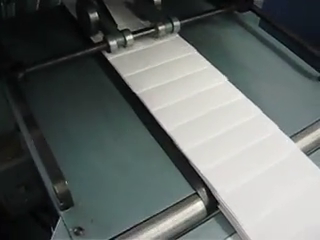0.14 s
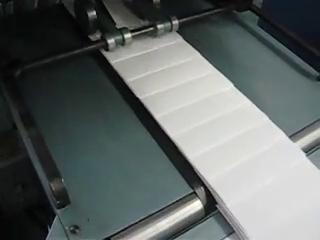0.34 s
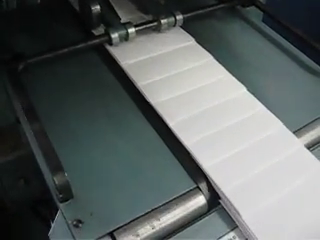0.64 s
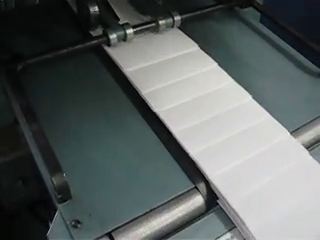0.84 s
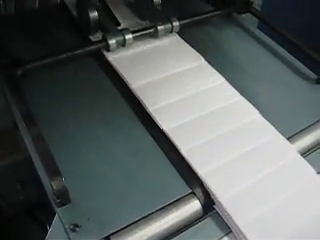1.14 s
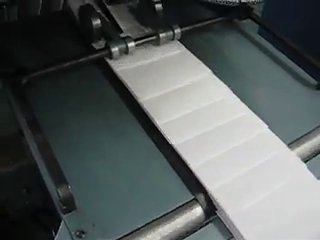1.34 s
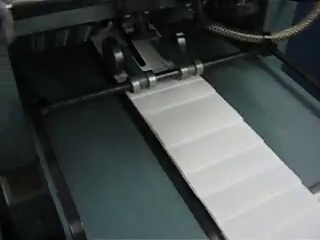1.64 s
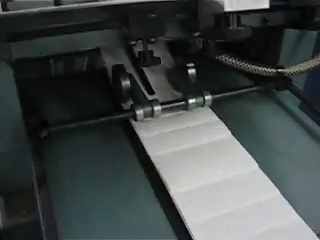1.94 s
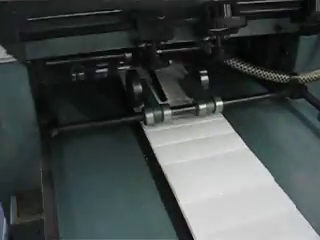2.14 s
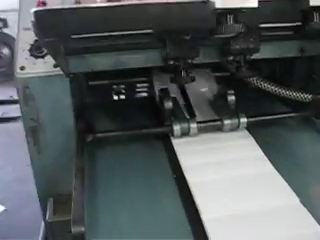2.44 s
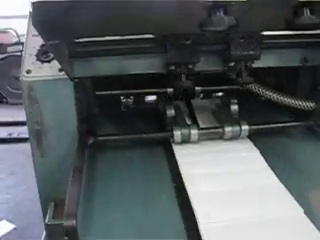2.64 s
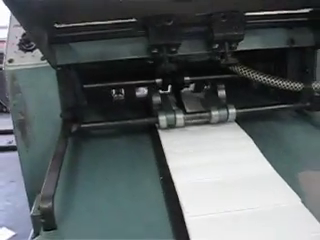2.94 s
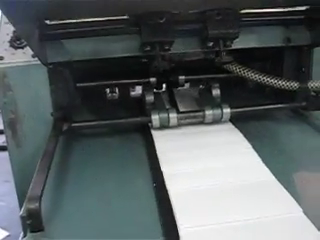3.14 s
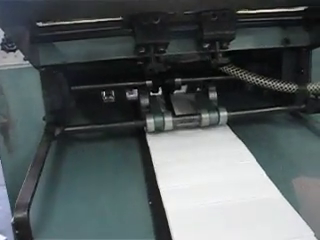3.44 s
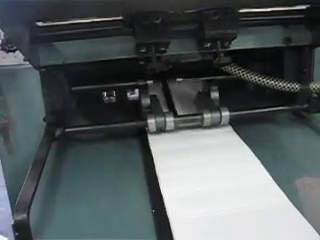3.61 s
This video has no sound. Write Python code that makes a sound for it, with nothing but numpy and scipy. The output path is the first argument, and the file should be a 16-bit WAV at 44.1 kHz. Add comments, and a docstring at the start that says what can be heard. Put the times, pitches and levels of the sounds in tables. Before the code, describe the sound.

A paper folding machine runs throughout with low motor hum, whirring rollers, rattling gears and fluttering air hiss. Sheets rustle and rumble in, swelling to sharp snaps near 0.35, 0.8, 1.2, 1.8, 2.3, 2.9 and 3.4 seconds, each followed by a short clack; light ticks precede many. From 1.4 to 2.3 seconds the microphones turn toward the rollers, changing the hiss. Close, loud, compressed, with brief workshop reverberation; another sheet rushes in at the end.

```python
"""Sheets snap into the fold of a paper folding machine in a workshop: noise bursts tick, snap and clack.
Each sheet rushes in before its snap as a growing rumble, rustle, hiss and crackle of coloured noise.
Under it the motor hums in sines, the rollers whirr and gears rattle as pulsing noise, and the feeder's air hisses.
The microphones move from beside the table round to face the rollers; the workshop answers the blows briefly.
The two microphone ports ring differently, and the limiter ducks the blows."""
import sys
import numpy as np
from scipy import signal
from scipy.fft import rfft, irfft, next_fast_len
from scipy.io import wavfile
from scipy.ndimage import uniform_filter1d, map_coordinates

SR = 44100
rng = np.random.default_rng(int(sys.argv[2]) if len(sys.argv) > 2 else 0)


def generate_wav(sig):
    """Save sig (samples, or channels by samples) to the path in sys.argv[1] as 16-bit PCM at SR."""
    pcm = np.round(np.clip(np.atleast_2d(sig).T, -1, 1) * 32767).astype(np.int16)
    wavfile.write(sys.argv[1], SR, pcm)


N = 166257
SHAFT_HZ, GEAR_HZ = 14.6, 73.47  # roller turns and gear knocks a second


def amp(db):
    """Decibels to gain."""
    return 10 ** (np.asarray(db) / 20)


def unit(x):
    """Scale to rms 1."""
    return x / np.sqrt(np.mean(x ** 2) + 1e-20)


def clock():
    """The time of every sample, in seconds."""
    return np.arange(N) / SR


def along(points, hz):
    """(frequency [Hz], value) points joined on a log frequency axis."""
    f, v = np.transpose(points)
    return np.interp(np.log(hz + 1), np.log(f + 1), v)


def curve(points):
    """(time [s], value) points joined by straight lines."""
    return np.interp(clock(), *np.transpose(points))


def wobble(rate):
    """A smooth random curve, rate knots a second."""
    return map_coordinates(rng.standard_normal(4096), [clock() * rate], mode="wrap")


def filtered(x, response):
    """x times a complex response of frequency, padded so that its ringing does not wrap round."""
    m = next_fast_len(N + SR // 2)
    hz = np.fft.rfftfreq(m, 1 / SR)
    return irfft(rfft(x, m) * response(hz), m)[..., :N]


# how alike the sound is at left and right: (frequency [Hz], likeness [0 unrelated to 1 mono])
LIKENESS = [(500, 1), (1600, .97), (2800, 0.87), (3600, 0.74), (6000, 0.53), (8500, 0.89), (11000, 0.067)]


def coloured(pair, spectrum):
    """Two unrelated signals become a stereo sound of rms 1, near mono in the bass."""
    def mid_side(hz):
        angle = np.arccos(np.clip(along(LIKENESS, hz), -1, 1)) / 2
        return amp(along(spectrum, hz)) * [np.cos(angle), np.sin(angle)]

    mid, side = filtered(pair, mid_side)
    return unit(np.array([mid + side, mid - side]))


def rush(spectrum, patchy_db):
    """Stereo noise whose gain varies in random patches of time and frequency."""
    z = signal.stft(rng.standard_normal((2, N)), nperseg=512)[2]
    field = uniform_filter1d(rng.standard_normal(z.shape[1:]), size=3, axis=0)  # across frequency
    field = uniform_filter1d(field, size=12, axis=1)  # across time
    patchy = signal.istft(z * amp(patchy_db * unit(field)), nperseg=512)[1]
    return coloured(patchy[:, :N], spectrum)


def burst(start, hold, t60):
    """A blow's envelope: sudden, held, then falling 60 dB in t60 seconds."""
    t = clock() - start
    return (t >= 0) * amp(-60 * np.clip((t - hold) / t60, 0, 2))


def beat(rate_hz, sharp, drift):
    """A swell once per turn of a slightly unsteady shaft, rms 1; drift is in turns."""
    turns = rate_hz * clock() + rng.random() + drift * wobble(5)
    return unit(np.exp(sharp * np.cos(2 * np.pi * turns)))


def strike(spectrum, start, hold, t60, crack):
    """A single crack of contact and a short rattle, both in the colour of the struck part."""
    envelope = burst(start, hold, t60)
    push = envelope * rng.standard_normal((2, N))
    push[0, int(start * SR)] += crack * np.linalg.norm(envelope)
    return coloured(push, spectrum) * np.sqrt(np.mean(push[0] ** 2))


# sheets snapping into the fold:
# (time [s], level [dB], hold [s], treble tilt above 1500 Hz [dB per octave], paper noise level [dB])
FOLDS = [(.3452, -12, .0045, 2, -2), (.8218, -9, .003, 1, 0), (1.178, -9, .004, 3.5, -.5),
         (1.8193, -7.5, .0035, 1.5, .5), (2.3418, -7, .0015, -1.5, -1), (2.942, -5, .0012, -2, -.5),
         (3.4275, -9.5, .003, -2, -.7)]
# paper edges ticking on the guides: (time [s], level [dB])
EDGE_TICKS = [(.158, -14.5), (0.285, -18), (.341, -13.5), (.762, -13), (1.118, -14), (1.761, -18),
              (2.28, -19), (2.34, -11), (2.941, -11), (3.39, -15), (3.472, -30)]
# the clack that follows each fold: (time [s], level [dB])
KNOCK_OUTS = [(.4138, -10.5), (.8893, -9.5), (1.2468, -12), (1.8877, -9), (2.408, -8.5), (3.0077, -8.5),
              (3.4947, -9.5)]
# colour of ticks and snaps: (frequency [Hz], relative level [dB per Hz])
SNAP_COLOUR = [(60, -48), (150, -30), (300, -13), (750, -2), (1700, 1.5), (2700, -4), (3500, -3), (4200, 0),
               (5700, -7), (7200, -3), (10000, -16), (15000, -28)]
# colour of the clacks: (frequency [Hz], relative level [dB per Hz])
CLACK_COLOUR = [(60, -48), (150, -26), (400, -11), (850, -9), (1300, -3), (1900, 1), (2450, -3), (3000, 3),
                (3500, -4), (4300, -2.5), (5700, -10), (7700, -8), (10000, -17), (15000, -26)]
TICK_T60_S, SNAP_T60_S = .022, .012
CLACK_HOLD_S, CLACK_T60_S = .008, .04
SNAP_CRACK, CLACK_CRACK = .35, .15  # the first contact against the rattle after it; ticks use the second


def blows():
    """Light ticks, the sharp snap of each fold and the longer clack as the sheet is knocked out."""
    out = np.zeros((2, N))
    for start, db in EDGE_TICKS:
        out += amp(db) * strike(SNAP_COLOUR, start, 0.0013, TICK_T60_S, CLACK_CRACK)
    for start, db, hold, tilt, _ in FOLDS:
        # the constant part of the tilt drops out when coloured() levels the sound
        colour = [(hz, level + tilt * np.log2(max(hz, 1500))) for hz, level in SNAP_COLOUR]
        out += amp(db) * strike(colour, start, hold, SNAP_T60_S, SNAP_CRACK)
    for start, db in KNOCK_OUTS:
        out += amp(db) * strike(CLACK_COLOUR, start, CLACK_HOLD_S, CLACK_T60_S, CLACK_CRACK)
    return out


NEXT_SHEET_S = 3.9  # when the sheet still on its way in would snap, after the end


def feed(rise_s, full_s, end_s, fall_s):
    """Each sheet swells in, is at full strength from full_s before its snap and fades end_s after it."""
    passes = [(row[0], row[-1]) for row in FOLDS] + [(NEXT_SHEET_S, 0)]
    levels = []
    for snap_s, db in passes:
        t = clock() - snap_s
        swell = np.clip((t + full_s) / rise_s + 1, 0, 1)
        fade = np.clip(1 - (t - end_s) / fall_s, 0, 1)
        levels.append(amp(db) * swell * fade)
    return np.max(levels, axis=0)


# roller and paper level at the moving microphones: (time [s], level [dB])
ROLLER_NEARNESS = [(0, -0.5), (1.35, -1.5), (1.9, 1.5), (2.5, 0.5), (3, 3), (3.77, 1.5)]
# paper rumbling through the rollers: (frequency [Hz], relative level [dB per Hz])
RUMBLE_COLOUR = [(60, -36), (250, -17), (360, -1), (600, -1), (800, -11), (1500, -2), (4000, -45)]
# paper rustling: (frequency [Hz], relative level [dB per Hz])
RUSTLE_COLOUR = [(60, -38), (300, -4), (700, -9), (1100, -1.5), (1650, 2), (2500, -1), (4000, -0.5),
                 (9000, -34), (15000, -33)]
# paper sliding and crackling: (frequency [Hz], relative level [dB per Hz])
SLIDE_COLOUR = [(1000, -19), (4000, -4.5), (6000, -1), (7500, 0.5), (9200, 1), (10500, -7.5), (12500, -4),
                (15500, -23.5)]
RUMBLE_DB, RUSTLE_DB, SLIDE_DB, CRACKLE_DB = -32, -27, -26, -34.5  # before swells and nearness
RUMBLE_LUMP_DB, SLIDE_FLICKER_DB = 3, 1.7


def paper():
    """Sheets rumble in lumps through the rollers, rustle, slide with a fluttering hiss and crackle."""
    near_db = curve(ROLLER_NEARNESS)
    rolling = feed(rise_s=.17, full_s=.12, end_s=0.0063, fall_s=0.076) * amp(near_db)
    # nearness acts twice on the rumble, once on the rustle
    rumble_gain = amp(RUMBLE_DB + near_db + RUMBLE_LUMP_DB * wobble(45))
    rumble = rumble_gain * rush(RUMBLE_COLOUR, patchy_db=1.5)
    rustle = amp(RUSTLE_DB + 2.3 * wobble(90)) * rush(RUSTLE_COLOUR, patchy_db=2)

    sliding = feed(rise_s=0.3, full_s=0.12, end_s=0.036, fall_s=0.066)
    flutter = amp(SLIDE_DB + SLIDE_FLICKER_DB * wobble(50)) * beat(GEAR_HZ, sharp=0.38, drift=0.6)
    hiss = flutter * rush(SLIDE_COLOUR, patchy_db=5.0)
    clicks = rng.random(N) < 250 / SR  # about 250 a second
    grains = clicks * amp(2.5 * rng.standard_normal(N)) * rng.standard_normal((2, N))
    crackle = amp(CRACKLE_DB) * coloured(grains, SLIDE_COLOUR)
    return rolling * (rumble + rustle) + sliding * (hiss + crackle)


# hum of motor and shafts: (frequency [Hz], level [dB])
HUM_TONES = [(75, -62), (116.3, -50.5), (150, -51), (164.4, -50), (232.4, -45), (457, -45.5), (612, -42)]
# colour of rollers and gears: (frequency [Hz], relative level [dB per Hz])
ROLLER_COLOUR = [(30, -23), (60, -34), (110, -33), (160, -3.5), (200, -6.5), (310, -6.5), (400, 1),
                 (600, -2.5), (850, -6.5), (1250, -5.5), (1700, -2), (2400, -2.5), (3000, 1), (3600, -4),
                 (6000, -11.5), (15000, -23.5)]
ROLLERS_DB, GEARS_DB = -25, -34.5  # before nearness


def drive():
    """Motor hum, rollers whirring once a turn and gears rattling."""
    hum = np.zeros(N)
    for hz, db in HUM_TONES:
        tone = np.sqrt(2) * np.sin(2 * np.pi * hz * clock() + 0.61 * wobble(12))
        hum += amp(db + 1.4 * wobble(12)) * tone
    whirr = amp(ROLLERS_DB + 1.1 * wobble(35)) * beat(SHAFT_HZ, sharp=0.044, drift=0.15)
    rollers = whirr * rush(ROLLER_COLOUR, patchy_db=1.4)
    rattle = amp(GEARS_DB + 3.6 * wobble(60)) * beat(GEAR_HZ, sharp=2.2, drift=0.11)
    gears = rattle * rush(ROLLER_COLOUR, patchy_db=2.2)
    return hum + amp(curve(ROLLER_NEARNESS)) * (rollers + gears)


# level of the feeder's air: (time [s], level [dB])
AIR_LEVELS = [(0, -21), (.15, -21), (.18, -28), (.5, -23.5), (1, -24.5), (1.45, -22), (2.1, -21.5),
              (2.6, -23), (3.77, -24)]
# place of the microphones: (time [s], position [0 beside the table, 1 facing the rollers])
MIC_TURN = [(0, 0.086), (1.4, 0.27), (2.3, 0.93), (3.77, 0.95)]
# air heard from beside the table: (frequency [Hz], relative level [dB per Hz])
AIR_BESIDE_COLOUR = [(500, -49), (2000, -9.5), (3000, 1), (3600, -3.5), (4300, 2.5), (5200, -0.5),
                     (6000, -3.5), (7800, -7.5), (9200, -6), (10500, -17), (13000, -24.5), (15500, -25)]
# air heard facing the rollers: (frequency [Hz], relative level [dB per Hz])
AIR_FRONT_COLOUR = [(500, -21), (2000, -19), (3100, -2), (3600, -1.5), (4300, -1), (5000, 0.5), (5600, -4),
                    (6200, -8.5), (7000, -3), (8000, -1.5), (9200, -4.5), (10500, -14), (13000, -17),
                    (15500, -27)]


def air():
    """The feeder's air hisses and flutters; its colour changes as the microphones turn."""
    flutter = amp(curve(AIR_LEVELS) + 0.4 * wobble(24.72) + 0.54 * wobble(220))
    front = np.clip(curve(MIC_TURN), 0, 1)
    beside_hiss = np.sqrt(1 - front) * rush(AIR_BESIDE_COLOUR, patchy_db=2)
    front_hiss = np.sqrt(front) * rush(AIR_FRONT_COLOUR, patchy_db=2.5)
    return flutter * beat(GEAR_HZ, sharp=0.065, drift=0.54) * (beside_hiss + front_hiss)


ROOM_DB, ROOM_T60_S = -13, .2


def room(x):
    """The short answer of the machine frame and the workshop: x convolved with dying noise."""
    flat = [(100, 0), (10000, 0)]
    tail = coloured(rng.standard_normal((2, N)), flat) * burst(0, hold=0, t60=ROOM_T60_S)
    return signal.fftconvolve(x, tail / np.linalg.norm(tail[0]), axes=1)[:, :N]


def scene():
    """The running machine with sheets passing through it."""
    hits = blows()
    return hits + paper() + drive() + air() + amp(ROOM_DB) * room(hits)


# resonance of the left microphone port: (frequency [Hz], gain [dB])
LEFT_PORT_GAIN = [(3000, -1.5), (3600, -2), (4200, 8), (4800, 7), (6000, 2), (7500, -2.5), (9000, -2),
                  (10500, -5), (12000, 0.5), (15000, 0.5)]
# resonance of the right microphone port: (frequency [Hz], gain [dB])
RIGHT_PORT_GAIN = [(3000, -1), (3700, -4.5), (4400, -1.5), (6000, 0.5), (7300, 4.5), (9200, 4), (11000, 4),
                   (12500, -1)]
# phase by which the left port leads: (frequency [Hz], phase [radians])
LEFT_PORT_LEAD = [(1500, 0), (3800, 0), (5000, -1.7), (6300, -2), (7600, -1.1), (10000, -1.7)]
TURN_LAG_S = 1.7e-5  # delay of the left port when fully facing the rollers
LIMIT_RMS, ATTACK_S, RECOVER_DB_PER_S = .35, .0025, 60
LOW_CUT_HZ, TOP_HZ = 50, 15800


def record(dry):
    """Two resonant ports, a limiter that lets the first instant clip and recovers slowly, band limits."""
    def ports(hz):
        left = amp(along(LEFT_PORT_GAIN, hz)) * np.exp(1j * along(LEFT_PORT_LEAD, hz))
        return np.array([left, amp(along(RIGHT_PORT_GAIN, hz))])

    def band(hz):
        return (hz < TOP_HZ) * hz ** 4 / (hz ** 4 + LOW_CUT_HZ ** 4)

    left, right = filtered(dry, ports)
    heard_at = (clock() - TURN_LAG_S * curve(MIC_TURN)) * SR
    x = np.array([map_coordinates(left, [heard_at], order=5), right])

    keep = np.exp(-1 / (ATTACK_S * SR))
    power = signal.lfilter([1 - keep], [1, -keep], x ** 2).max(axis=0)  # the louder port ducks both
    over_db = 10 * np.log10(np.maximum(power / LIMIT_RMS ** 2, 1))
    ramp = RECOVER_DB_PER_S * clock()
    duck_db = np.maximum.accumulate(over_db + ramp) - ramp  # jumps up, falls back at a steady rate
    ducked = x * amp(-duck_db)
    clipped = ducked / (1 + ducked ** 6) ** (1 / 6)
    return filtered(clipped, band)


dry = scene()
out = record(dry)
generate_wav(out)
```